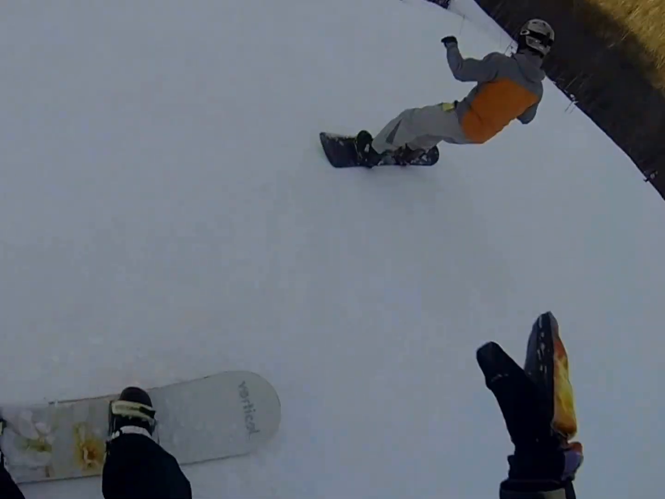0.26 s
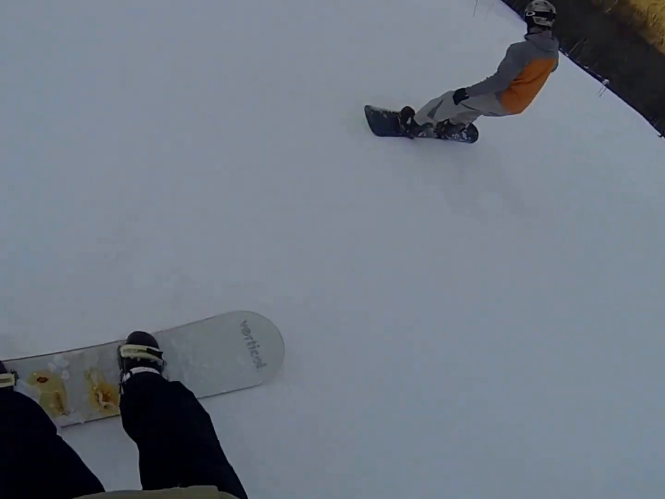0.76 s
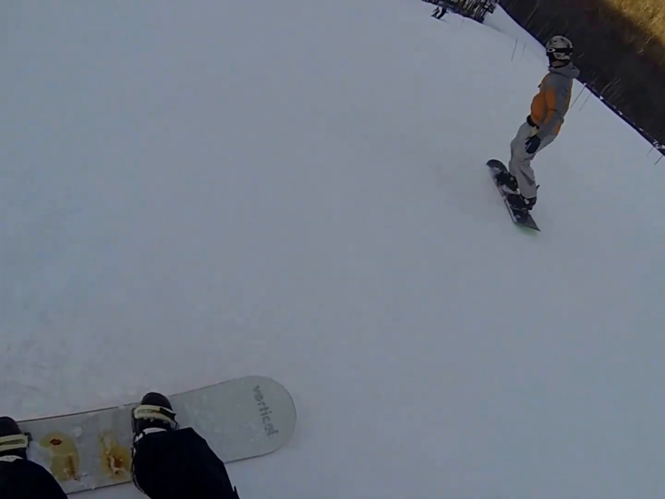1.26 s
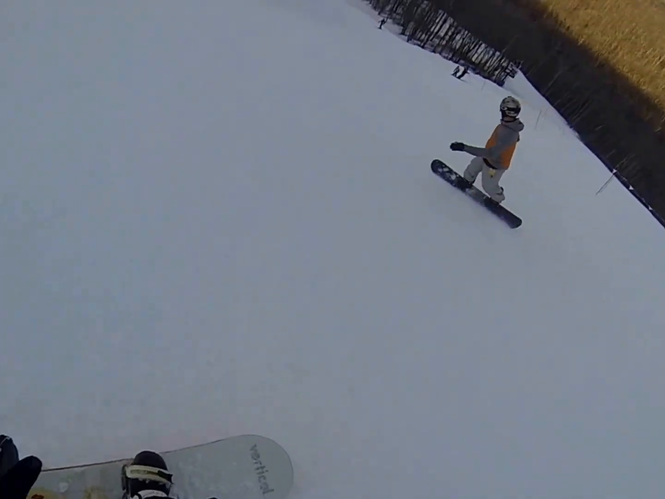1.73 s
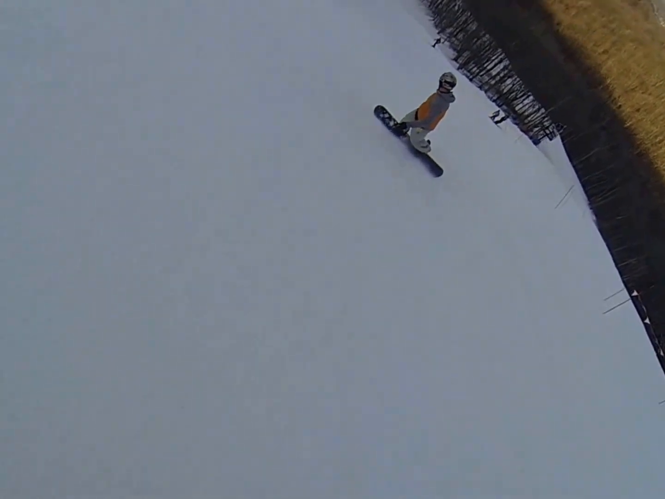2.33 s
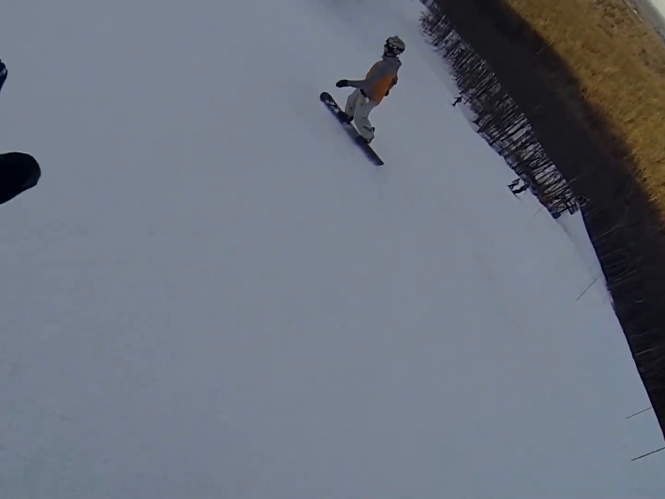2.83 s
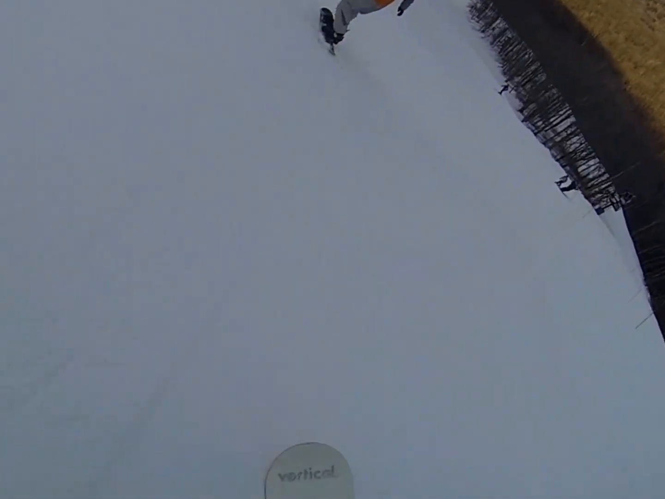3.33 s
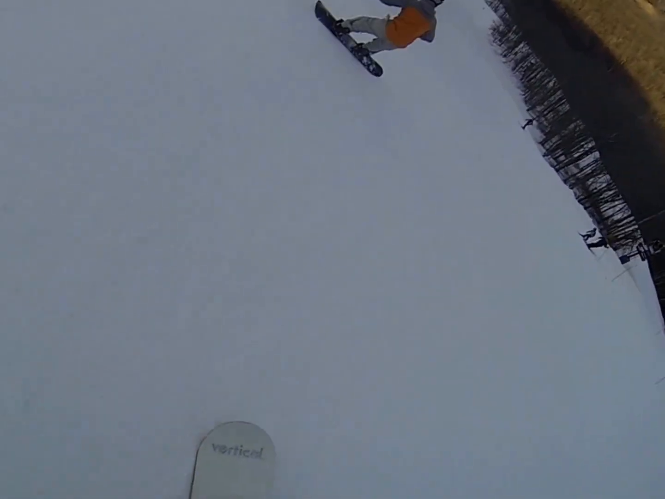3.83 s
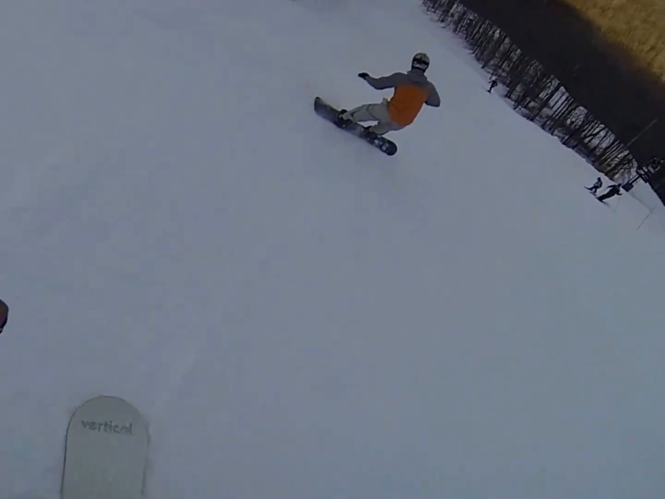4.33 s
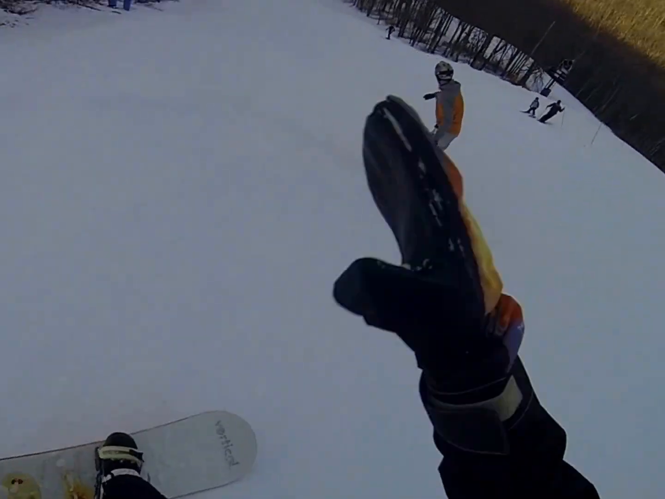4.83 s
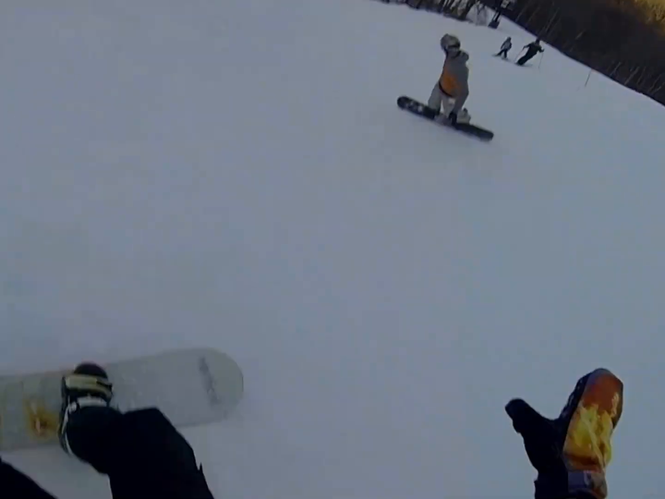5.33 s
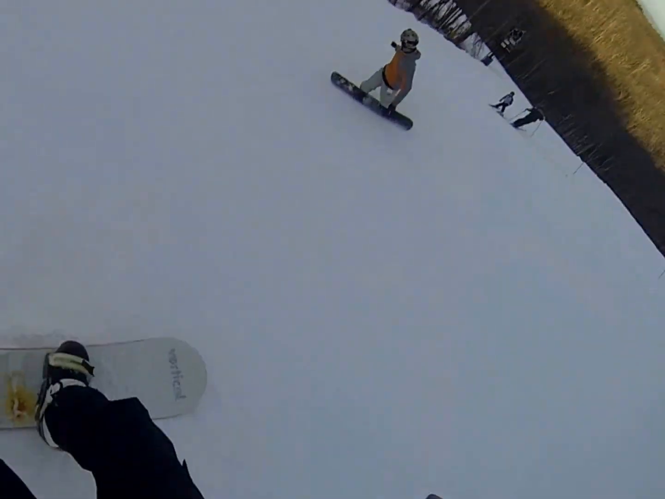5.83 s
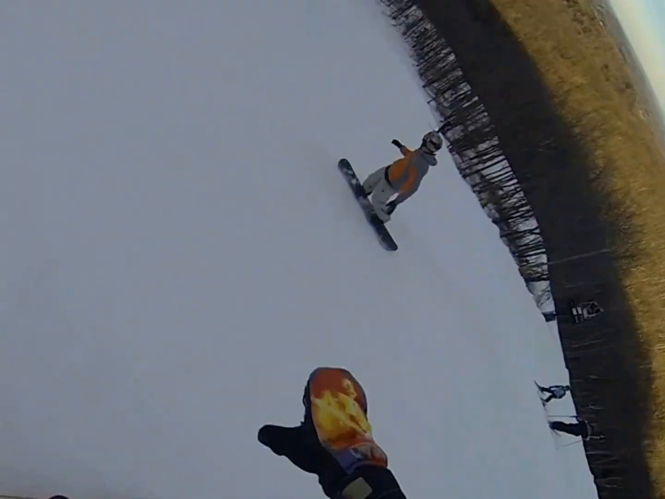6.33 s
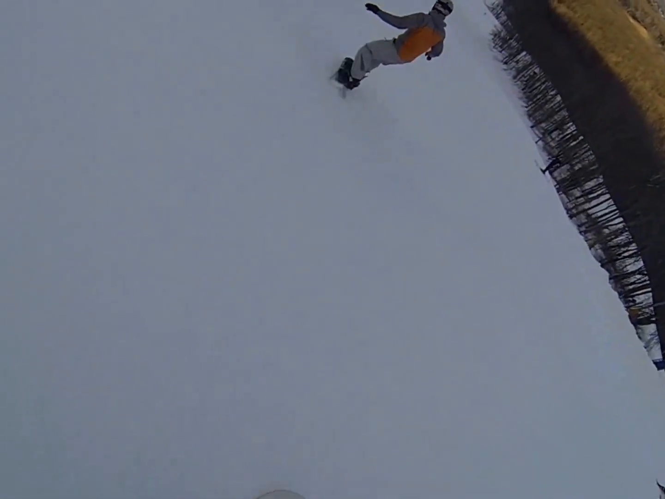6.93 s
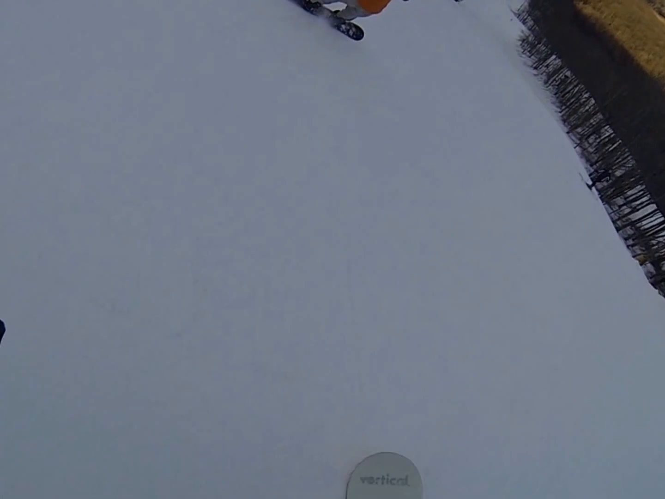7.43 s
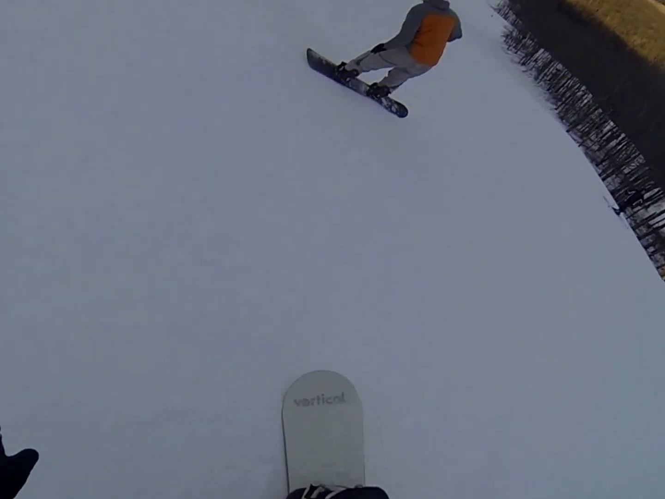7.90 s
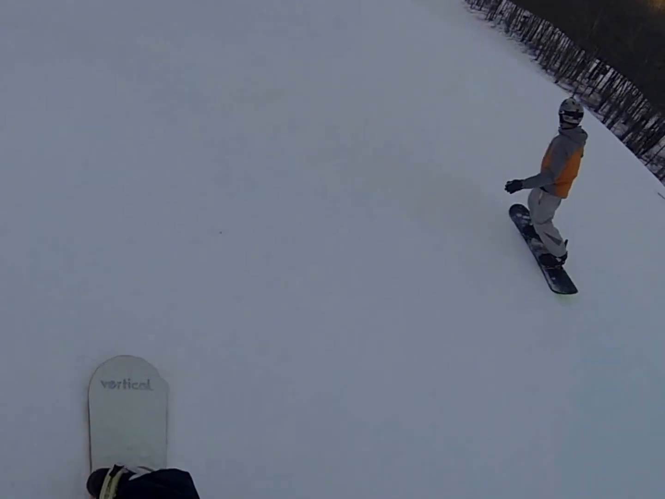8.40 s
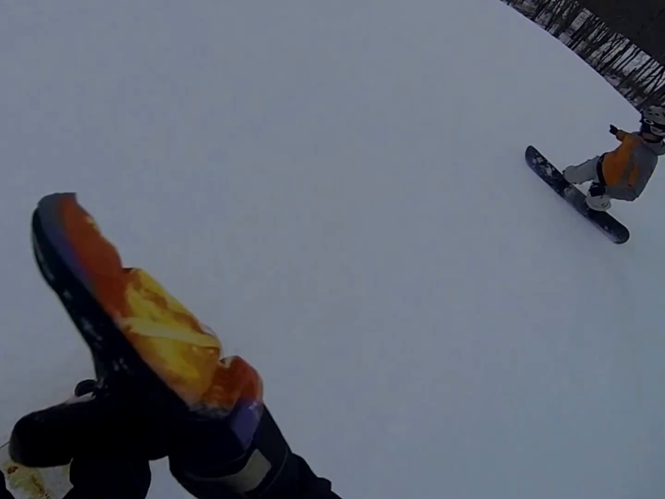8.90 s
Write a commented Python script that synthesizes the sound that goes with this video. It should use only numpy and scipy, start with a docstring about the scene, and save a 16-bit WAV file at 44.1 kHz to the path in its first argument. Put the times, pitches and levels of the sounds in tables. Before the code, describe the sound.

A close helmet-microphone perspective of snowboarding down an open groomed slope, lasting about nine seconds. The base slides continuously with a wavering, noisy mid-pitched note, over grainy ploughing and fine powder hiss. In the first half second, wind thumps, edge scrapes, sharp snow cracks and hollow plastic knocks crowd together. From 0.6 to 2.9 seconds the ride is smoother, with successive carves spraying snow and a few light taps. Scrapes return around 3 to 4.2 seconds, with brief gusts and knocks near 4.1. From 4.6 the edge rasps harder; between 5.2 and 6.5 strong low buffeting and rapid case knocks make the roughest passage. It eases around 7 seconds into gliding and carving. Scrapes and bumps resume near 8, with a hard knock at 8.1 and another gusty jolt around 9.1. A barely audible high electronic whine flutters throughout.

```python
"""On a groomed slope a snowboard carves turns, heard from a helmet camera in a plastic case.
The base glides with a wandering noisy note; the edge bites and ploughs through packed grains and
throws spray and hissing powder, all made of coloured cracks and noise under moving gains.
Wind noise buffets the case and drums on its shell; eddies suck at it, and jolts thump it and make
its shell and case modes ring. The electronics sing faintly in quick bursts."""
import sys
import numpy as np
from scipy import signal
from scipy.fft import rfft, irfft, next_fast_len
from scipy.io import wavfile
from scipy.ndimage import uniform_filter1d

SR = 44100
rng = np.random.default_rng(int(sys.argv[2]) if len(sys.argv) > 2 else 0)


def store_wav(level_fs):
    """Save 16-bit WAV to argv[1]."""
    pcm = np.round(np.clip(np.atleast_2d(level_fs), -1, 1) * 32767)
    wavfile.write(sys.argv[1], SR, pcm.T.astype(np.int16))


N = 403956
TIME = np.arange(N) / SR

# Carves, in which the edge digs in and throws snow. Each row: start in seconds, length in seconds,
# then mid-carve levels of ploughing, spray and powder in dB, before the board's own trims and judder,
# centre of the powder's hiss in Hz, share of that centre in dB.
CARVES = [(0.0, 0.56, -55.5, -53, -64.5, 7000, -12), (0.571, 0.37, -52.5, -42, -60, 8830, -4),
          (1.05, 0.49, -58, -52, -72, 8400, -18), (1.577, 0.35, -52.5, -44.5, -58.5, 8350, -11),
          (2.109, 0.77, -72.5, -52.5, -66.5, 8150, -7.5), (2.84, 0.36, -50.5, -51, -60.5, 8450, -3),
          (3.318, 0.3, -48, -50.5, -58, 8200, -5), (3.72, 0.45, -57, -51, -60, 8100, -14),
          (4.366, 0.34, -72, -50.5, -64.5, 6400, -9.5), (4.82, 0.61, -46, -51, -74, 6705, -16.5),
          (5.602, 0.57, -57, -54, -70, 6800, -11), (6.04, 0.27, -59.5, -49, -59.5, 8160, -14),
          (6.499, 0.31, -58.5, -51.5, -62, 8650, -12), (7.234, 0.22, -43.5, -47, -65.5, 8500, 0.5),
          (7.619, 0.51, -58, -52, -75, 8500, -3), (8.642, 0.52, -67, -75, -68.5, 7160, -3)]
# Resonances of the case that colour the hiss.
# Each row: centre in Hz, width in Hz, lift in dB (negative dips).
CAVITY = [(3458, 270, 9.5), (5000, 80, 7.5), (5320, 220, 3.5), (5800, 250, -2.5), (6370, 400, 8),
          (7820, 430, 9)]
# The gliding note: centre, spread of its wander, and rise (Hz) approached as the edge outweighs the base
NOTE_HZ, NOTE_WANDER_HZ, NOTE_RISE_HZ = 1435, 50, 89.8


def from_db(db):
    """Turn decibels into an amplitude factor."""
    return 10 ** (np.asarray(db) / 20)


def rms_one(x):
    """Scale a sound to rms 1."""
    return x / np.sqrt(np.mean(x ** 2) + 1e-20)


def in_time(rows):
    """Draw each column of a table as a straight-lined curve over every sample."""
    s, *columns = np.transpose(rows)
    return [np.interp(TIME, s, c) for c in columns]


def drift(rate_hz):
    """Slow random wander of rms about 1: noise through two equal low-pass poles at the given rate."""
    step = 40   # samples between knots
    settle = 2000   # knots dropped while the filter settles
    knots = rng.standard_normal(N // step + settle + 2)
    r = np.exp(-2 * np.pi * rate_hz * step / SR)
    slow = signal.lfilter([1], [1, -2 * r, r * r], knots)[settle:]
    return np.interp(np.arange(N) / step, np.arange(len(slow)), rms_one(slow))


def colour(x, spectrum, resonances=()):
    """Shape a steady sound by a smooth spectrum and narrow lifts; rms 1."""
    size = next_fast_len(N)
    hz = np.arange(size // 2 + 1) * SR / size
    points = np.array(spectrum)
    db = np.interp(np.log(hz + 1), np.log(points[:, 0]), points[:, 1])
    # above the last point the sound falls by 12 dB an octave
    db -= 20 * np.log10(np.maximum(hz / points[-1, 0], 1) ** 2)
    for centre, width, lift in resonances:
        db += lift / (1 + (2 * (hz - centre) / width) ** 2)
    return rms_one(irfft(rfft(x, size) * from_db(db), size)[:N])


def even_out(x, span_s):
    """Hold the short-term rms near 1."""
    power = uniform_filter1d(x ** 2, max(int(span_s * SR), 2))
    return x / np.sqrt(power + 1e-6)


def ring(clicks, hz, t60):
    """Two-pole resonator: a unit click starts a sine of height 1 that falls 60 dB in t60 seconds."""
    r = from_db(-60 / (t60 * SR))
    w = 2 * np.pi * hz / SR
    return signal.lfilter([0, np.sin(w)], [1, -2 * r * np.cos(w), r * r], clicks + 1e-18)


def add(out, s, sound):
    """Mix a sound in at time s."""
    start = max(round(s * SR), 0)
    out[start:start + len(sound)] += sound[:N - start]


def grains(per_s, spread_db, hiss_db):
    """Snow crystals break at random with varied sizes, over a smooth hiss relative to their rms."""
    sizes = from_db(spread_db * np.minimum(rng.exponential(1, N), 4))
    signed = sizes * rng.choice([-1, 1], N)
    cracks = signed * (rng.random(N) < per_s / SR)
    return rms_one(cracks) + from_db(hiss_db) * rng.standard_normal(N)


def narrow_band(centre_hz, width_hz):
    """Low-passed noise shifted up to gather around a moving centre; rms 1."""
    lowpass = signal.butter(2, width_hz / 2, fs=SR, output="sos")
    flutter = signal.sosfilt(lowpass, rng.standard_normal((2, N)))
    phase = 2 * np.pi * np.cumsum(centre_hz) / SR
    return rms_one(flutter[0] * np.cos(phase) + flutter[1] * np.sin(phase))


def strokes(rows, attack_s, release_s, slope_db_per_s=0):
    """Movements (start, length, dB, ..) that rise, hold with a slope and let go; a gain per dB column."""
    power = np.zeros((len(rows[0]) - 2, N))
    for start, length, *levels in rows:
        t = np.arange(0, length + release_s, 1 / SR)
        rise = np.clip(t / attack_s, 0, 1)
        fall = np.clip(1 - (t - length) / release_s, 0, 1)
        slope_db = slope_db_per_s * (t - length / 2)   # the row's level holds at mid-length
        for track, db in zip(power, levels):
            add(track, start, (rise * fall * from_db(db + slope_db)) ** 2)
    return np.sqrt(power)


def board(glide_gain, plough_gain, bite_gain, spray_gain):
    """Base and edge crush the snow; the ridged surface shakes their sounds together."""
    # Colours of the four sounds. Each row: frequency in Hz, relative level in dB.
    glide_colour = [(600, -22), (1000, -11.5), (1170, -6), (1290, 0), (1430, 1.5), (1540, 1), (1620, -2.5),
                    (1740, -17), (2100, -11.5), (4000, -34)]
    plough_colour = [(150, -20.5), (300, 2.5), (420, 0), (600, 0), (800, -2.5), (1050, -6.5), (1500, -9),
                     (3000, -13.5)]
    bite_colour = [(900, -21), (1400, 1.5), (1700, -1.5), (1900, 0), (2150, -15), (2600, -14.5),
                   (3400, -14.5), (6000, -76)]
    spray_colour = [(1200, -42), (2000, -5.5), (2600, 5), (2900, 2), (3200, -5), (3800, -5.5), (4450, -6),
                    (4780, -8), (5900, -15), (7000, -25.5), (10000, -39), (15300, -68)]
    edge_share = bite_gain / (bite_gain + glide_gain)
    note_hz = NOTE_HZ + NOTE_WANDER_HZ * drift(6) + NOTE_RISE_HZ * edge_share
    judder = drift(35)
    rasp = drift(66)   # the edge catches and slips
    note = from_db(-3) * narrow_band(note_hz, width_hz=150)
    base_noise = colour(grains(900, spread_db=1.0, hiss_db=-2.5), glide_colour)
    glide = even_out(base_noise + note, span_s=0.058)
    plough = colour(grains(1800, spread_db=2, hiss_db=2.0), plough_colour)
    crunch = grains(1500, spread_db=3.3, hiss_db=-2)
    bite = even_out(colour(crunch, bite_colour), span_s=0.07)
    spray = colour(grains(6000, spread_db=-0.5, hiss_db=1.0), spray_colour, CAVITY)
    # each dB sum: a fixed trim plus the shaking
    return (glide * glide_gain * from_db(1.0 + 1.26 * judder)
            + plough * plough_gain * from_db(1.16 + 1.15 * judder)
            + bite * bite_gain * from_db(0.7 + 3.0 * rasp)
            + spray * spray_gain * from_db(-0.45 + 1.17 * judder))


def riding():
    """Gains of glide, plough, bite, spray and powder: the base slides; carves and scrapes add power."""
    # The base gliding under the rider's weight, before bumps and lifts.
    # Each row: time in seconds, level in dB.
    glide_levels = [(0.0, -45.5), (0.25, -42.5), (0.64, -46.5), (0.92, -40.5), (1.53, -46), (1.94, -40.5),
                    (2.22, -46), (2.63, -46), (2.76, -42.5), (3.7, -40), (4.59, -45.5), (5.38, -36.5),
                    (6.15, -44.5), (6.35, -40), (7.22, -45), (7.58, -38), (8.32, -42), (9.16, -37.5)]
    # The board ploughing through loose snow, before lifts. Each row: time in seconds, level in dB.
    plough_levels = [(0.0, -50.5), (0.74, -55), (1.02, -51.5), (1.96, -55), (2.19, -63), (2.7, -60),
                     (3.09, -51), (3.83, -49.5), (4.51, -61.5), (5.1, -43), (5.38, -48), (6.1, -57),
                     (6.3, -52.5), (7.24, -57.5), (7.5, -45.5), (8.27, -57), (9.06, -49), (9.16, -51)]
    # Scrapes, in which the edge skids on hard snow. Each row: start in seconds, length in seconds,
    # then mid-scrape levels of bite, spray and ploughing in dB, before lifts and the board's trims.
    scrape_rows = [(0.135, 0.047, -39, -56.5, -48), (0.2, 0.04, -44.5, -48, -45),
                   (0.29, 0.1403, -42, -51, -48.5), (1.97, 0.14, -44.5, -62, -63.5),
                   (2.96, 0.1395, -47, -54.5, -46), (3.26, 0.04, -41, -51, -52),
                   (3.45, 0.082, -41.5, -49.5, -50), (3.78, 0.15, -38, -52, -58),
                   (3.94, 0.16, -50, -65, -51.5), (4.14, 0.16, -45, -47.5, -71.5),
                   (4.66, 0.08, -38, -47.5, -58), (4.81, 0.17, -38, -46.5, -42),
                   (5.12, 0.12, -41, -41.5, -46), (5.33, 0.082, -41, -45.5, -56),
                   (5.54, 0.057, -42, -44.5, -48), (5.72, 0.1, -40, -51.5, -49.5),
                   (5.94, 0.05, -43, -53, -50.5), (6.14, 0.07, -43, -62, -53),
                   (6.27, 0.079, -34, -48, -47.5), (6.4, 0.09, -42.5, -49, -51.5),
                   (8.13, 0.0963, -41, -58, -65), (8.34, 0.128, -40.5, -52.5, -57.5),
                   (8.52, 0.031, -34.5, -49, -46), (7.77, 0.059, -43, -58, -64.5),
                   (7.98, 0.069, -51, -48, -55), (8.67, 0.17, -41.5, -52, -55),
                   (9.05, 0.083, -40.5, -63.5, -42)]
    glide = from_db(in_time(glide_levels)[0] + 1.5 * drift(8.1))   # bumps of 1.5 dB rms
    loose_snow = from_db(in_time(plough_levels)[0])
    carve_plough, carve_spray, carve_powder = strokes(
        [row[:-2] for row in CARVES], attack_s=0.1, release_s=0.34, slope_db_per_s=1)
    scrape_bite, scrape_spray, scrape_plough = strokes(
        scrape_rows, attack_s=0.032, release_s=0.03, slope_db_per_s=13.5)
    # a scrape also presses the base down
    pressed_glide = np.hypot(glide, scrape_bite * from_db(-5))
    plough = np.linalg.norm([loose_snow, carve_plough, scrape_plough], axis=0)
    # the edge bites a little in loose snow too
    bite = np.hypot(scrape_bite, loose_snow * from_db(-3))
    # the flat base throws some spray and powder of its own
    spray = np.linalg.norm([glide * from_db(-13), carve_spray, scrape_spray], axis=0)
    dust = np.linalg.norm([glide * from_db(-25.5), carve_powder, scrape_spray * from_db(-20)], axis=0)
    return contact() * np.array([pressed_glide, plough, bite, spray, dust])


def contact():
    """Share of the rider's weight on the snow: in lifts the board goes light and its sounds sink."""
    # Each row: start in seconds, length in seconds, share of the weight lost from 0 to 1.
    lift_rows = [(0.47, 0.17, 0.1), (2.11, 0.026, 0.55), (4.75, 0.025, 0.2), (5.018, 0.091, 0.31),
                 (5.464, 0.06, 0.11), (5.63, 0.057, 0.21), (5.992, 0.075, 0.35), (6.216, 0.04, 0.45),
                 (7.031, 0.188, 0.25), (8.219, 0.036, 0.13), (8.581, 0.073, 0.08)]
    lift_s, landing_s = 0.0041, 0.021
    weight = np.ones(N)
    for start, length, lost in lift_rows:
        end = start + length
        corners = [start, start + lift_s, end, end + landing_s]
        weight *= 1 - lost * np.interp(TIME, corners, [0, 1, 1, 0])
    return weight


def powder(gain):
    """Fine crystals hiss in the air, with one band that moves from carve to carve."""
    # Colour of the broad hiss. Each row: frequency in Hz, relative level in dB.
    dust_colour = [(3500, -17), (5400, 3.5), (6600, -5), (7300, -2.5), (8000, -8), (8800, -4.5), (9400, -4),
                   (11400, -7.5), (12500, -16), (13500, -12), (14400, -16), (15300, -34)]
    middles = [(start + length / 2, hz, share) for start, length, *_, hz, share in CARVES]
    centre_hz, share_db = in_time(middles)
    broad = colour(grains(9000, spread_db=0.0, hiss_db=-9.5), dust_colour, CAVITY)
    band = from_db(share_db) * narrow_band(centre_hz, width_hz=1040)
    return gain * from_db(-2) * (broad + band)


def snaps(attack_s=0.0042, decay_s=0.0055, trim_db=-2):
    """Hard crumbs of snow crack in short bright bursts of coloured noise."""
    # Each row: time in seconds, level in dB before the trim and the burst's shape.
    snap_rows = [(0.332, -24.5), (0.34, -30), (0.4234, -32.5), (5.3991, -33), (5.569, -34.5), (5.5854, -33),
                 (5.968, -41), (8.132, -37)]
    burst, t = np.zeros(N), TIME[:SR // 20]
    shape = np.minimum(t / attack_s, 1) * np.exp(-t / decay_s)
    for s, db in snap_rows:
        add(burst, s, from_db(db + trim_db) * shape)
    bright = [(1000, -22), (2500, 17.5), (4000, 12.0), (8000, -0.5), (14000, -11)]   # (Hz, dB)
    return burst * colour(rng.standard_normal(N), bright, CAVITY)


def jolts(rows, rattle_s=0.0044, rattle_db=-17, soft_hz=2050, contact_s=0.0028,
          knock_trim_db=2.0, thud_trim_db=5):
    """Each jolt is a brief push that booms the shell, and a padded, rattling knock that rings the case."""
    # What the case rings with when jolted.
    # Each row: multiple of the knock's pitch, relative level in dB, t60 in seconds.
    case_modes = [(.58, -48, 0.0043), (.86, 8.5, 0.0048), (1.07, 14.5, 0.0059), (1.33, -31, 0.0062),
                  (1.77, 3, 0.0029), (2.33, -27, .010)]
    # What the shell booms with when pushed.
    # Each row: frequency in Hz, relative level in dB, t60 in seconds.
    shell_modes = [(263, -7, 0.091), (312, 1.5, 0.016)]
    out, t = np.zeros(N), TIME[:SR // 12]
    tap = 1.0 * (t == 0)
    push = np.convolve(tap, np.hanning(max(int(contact_s * SR), 3)))[:len(t)]
    unit_push = push / push.sum()
    boom = sum(from_db(level) * ring(unit_push, hz, t60) for hz, level, t60 in shell_modes)
    thud = -push - boom
    padding = signal.butter(3, soft_hz, fs=SR, output="sos")
    noises = rng.standard_normal((len(rows), len(t)))
    for (s, knock_db, thud_db, pitch_hz), noise in zip(rows, noises):
        rattle = from_db(rattle_db) * noise * np.exp(-t / rattle_s)
        blow = signal.sosfilt(padding, tap + rattle)
        # neighbouring modes swing against each other, so the knock swells for a moment
        knock = sum((-1) ** k * from_db(level) * ring(blow, multiple * pitch_hz, t60)
                    for k, (multiple, level, t60) in enumerate(case_modes))
        knock /= np.abs(knock).max()
        add(out, s, from_db(knock_db + knock_trim_db) * knock + from_db(thud_db + thud_trim_db) * thud)
    return out


def ridges(glide_gain, per_s=14, spread_db=7.0, spread_hz=80):
    """Small ridges jog the case at random, denser and stronger where the board presses harder."""
    # the full rate holds only at the loudest glide
    pressure = (glide_gain / glide_gain.max()) ** 3
    at = np.flatnonzero(rng.random(N) < per_s / SR * pressure)
    chance = rng.standard_normal((200, 3))   # at most 200 ridges
    rows = []
    for i, db, (a, b, c) in zip(at, 20 * np.log10(glide_gain[at]), chance):
        # seconds, knock dB and thud dB before the trims in jolts(), pitch in Hz
        rows.append((i / SR, db + 4.5 + spread_db * a, db - 2 + spread_db * b, NOTE_HZ + spread_hz * c))
    return rows


def wind(stream_trim_db=4.0):
    """Turbulence presses on the case and drums on its shell; gusts raise both."""
    # The air stream between gusts. Each row: time in seconds, level of buffeting in dB before trim
    # and swirl, level of the shell's drumming in dB before flurry.
    airflow = [(0.0, -29, -46), (0.94, -35.5, -49.5), (1.17, -37.5, -47.5), (1.55, -34.5, -53.5),
               (2.63, -42, -51.5), (2.91, -38.5, -46), (3.06, -39, -51), (4.08, -32, -41),
               (4.41, -36.5, -53.5), (5.59, -30.5, -39.5), (6.05, -30, -44.5), (6.38, -30.5, -44),
               (6.73, -38.5, -49), (7.27, -31, -48), (7.55, -33.5, -40), (7.91, -30.5, -41),
               (8.32, -34, -45.5), (9.16, -29.5, -40.5)]
    # Gusts on top of it. Each row: start in seconds, length in seconds, level of buffeting in dB,
    # level of drumming in dB before flurry.
    gust_rows = [(0.0, 0.074, -20, -59), (0.23, 0.18, -20.5, -39), (0.66, 0.36, -30.5, -61),
                 (1.5, 0.049, -35, -62), (2.94, 0.15, -27.5, -47), (3.28, 0.045, -32, -51.5),
                 (3.36, 0.091, -24, -51), (3.54, 0.09, -30, -43), (4.66, 0.42, -28, -48.5),
                 (4.06, 0.13, -28, -44.5), (5.14, 0.027, -17.5, -48), (5.3, 0.24, -16, -38.5),
                 (5.63, 0.1, -13.5, -40), (5.81, 0.13, -19, -40.5), (6.37, 0.12, -17.5, -37),
                 (7.33, 0.201, -31, -45), (7.86, 0.07, -23.5, -44), (8.04, 0.06, -25, -45),
                 (8.99, 0.17, -18.5, -38)]
    # Colours of the two noises. Each row: frequency in Hz, relative level in dB.
    buffet_colour = [(12, -2), (20, -6.5), (28, 5.5), (42, -7.5), (60, -14), (90, -23.5), (140, -31.5),
                     (250, -59), (500, -67)]
    drum_colour = [(60, -6.5), (105, -2), (170, -4.5), (255, 3.5), (310, -4), (370, -11), (480, -17),
                   (700, -29), (1200, -53)]
    stream, drumming = from_db(in_time(airflow))
    gust, gust_drumming = strokes(gust_rows, attack_s=0.0123, release_s=0.04)
    buffet = even_out(colour(rng.standard_normal(N), buffet_colour), span_s=0.0463)
    drum = even_out(colour(rng.standard_normal(N), drum_colour), span_s=0.05)
    swirl = from_db(2.6 * drift(10))
    flurry = from_db(2.3 * drift(28))
    buffet_gain = np.hypot(stream * from_db(stream_trim_db) * swirl, gust)
    drum_gain = np.hypot(drumming, gust_drumming) * flurry
    return buffet * buffet_gain + drum * drum_gain


def eddies(build_s=0.019, leak_hz=22):
    """A passing eddy sucks at the case; the pressure leaks back (a high-pass) and overshoots."""
    # The strongest eddies. Each row: time of deepest suction in seconds,
    # depth in dB before the leak, release in seconds.
    eddy_rows = [(0.259, 0.5, 0.016), (0.338, 2.5, 0.00416), (0.372, -3, 0.0081), (3.091, -11.5, 0.021),
                 (3.566, -14.5, 0.0021), (5.454, 4, 0.012), (5.498, -0.5, 0.0077), (5.695, 4, 0.012),
                 (5.835, 1.5, 0.0172), (5.890, -0.5, 0.0083), (6.441, 0, 0.022), (7.904, -10, 0.006)]
    out = np.zeros(N)
    for s, db, release in eddy_rows:
        t = np.arange(-build_s, release, 1 / SR)
        suction = np.cos(np.pi / 2 * t / np.where(t < 0, build_s, release)) ** 2
        add(out, s - build_s, -from_db(db) * suction)
    return signal.sosfilt(signal.butter(2, leak_hz, "high", fs=SR, output="sos"), out)


def whine(pitch_hz=12885, level_db=-75, bursts_per_s=47.955, duty=0.52, octave_below_db=-1):
    """The camera's electronics sing faintly in regular bursts on a high note and its lower octave."""
    cycle = ((TIME - 0.0165) * bursts_per_s + .5) % 1
    busy = abs(cycle - .5) < duty / 2
    gate = uniform_filter1d(1.0 * busy, size=128)   # softens the switching
    phase = 2 * np.pi * np.cumsum(pitch_hz + 20 * drift(40)) / SR
    tones = np.sin(phase) + from_db(octave_below_db) * np.sin(phase / 2)
    # the root of 2 makes the level the rms of the upper note in a burst
    return from_db(level_db) * gate * np.sqrt(2) * tones


def scene():
    """The board and its powder below, jolts, wind and whine at the case."""
    # Jolts of the case. Each row: time in seconds, level of the knock in dB and of the thud in dB,
    # both before the trims in jolts(), pitch of the knock in Hz.
    jolt_rows = [(0.2105, -21, -32, 1410), (0.247, -36, -24.5, 1330), (0.3354, -18.5, -16, 1560),
                 (0.342, -19, -26, 1250), (0.4031, -19, -24, 1440), (0.88, -28.5, -32, 1350),
                 (1.014, -29, -32.5, 1450), (1.434, -32, -37, 1510), (2.0753, -29, -45, 1230),
                 (3.035, -29, -74, 1390), (4.133, -22.5, -25.5, 1440), (4.1729, -24, -31, 1500),
                 (5.2303, -23.5, -30, 1347), (5.3402, -20, -28.5, 1294), (5.3772, -18.5, -23, 1510),
                 (5.4001, -20, -32, 1590), (5.413, -27, -25, 1332), (5.4948, -18.5, -18, 1460),
                 (5.5642, -20, -27.5, 1553), (5.6608, -25, -29, 1490), (5.6967, -17, -17.5, 1495),
                 (5.725, -24, -38, 1350), (5.7667, -18, -24.5, 1540), (5.888, -15.5, -19.5, 1430),
                 (5.948, -19, -25.5, 1570), (6.2362, -28, -29.5, 1558), (6.4078, -22, -24.5, 1580),
                 (6.4334, -19, -26, 1250), (6.4479, -21.5, -22.5, 1390), (6.499, -18.5, -24, 1520),
                 (6.6713, -26, -44, 1250), (6.78, -29, -38.5, 1377), (7.9391, -24.5, -43, 1250),
                 (7.949, -21.5, -30, 1470), (8.1069, -15, -24, 1480), (8.1306, -25.5, -27.5, 1538),
                 (9.0818, -14, -23, 1505)]
    glide, plough, bite, spray, dust = riding()
    snow = board(glide, plough, bite, spray) + powder(dust) + snaps()
    knocks = jolts(list(jolt_rows) + ridges(glide))
    return (snow + knocks + wind() + eddies() + whine())[None]


def record(dry):
    """Peaks are clipped hard at 0.97, then a steep low-pass cuts the top at 15300 Hz."""
    lowpass = signal.ellip(10, .1, 80, 15300, fs=SR, output="sos")
    return signal.sosfilt(lowpass, np.clip(dry, -.97, .97))


dry = scene()
out = record(dry)
store_wav(out)
```